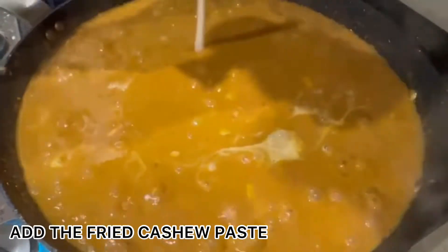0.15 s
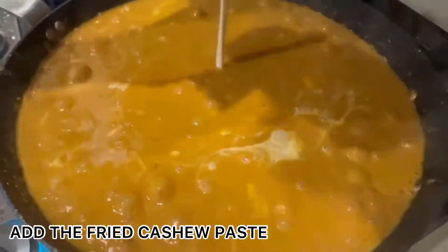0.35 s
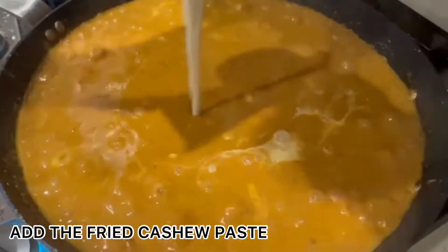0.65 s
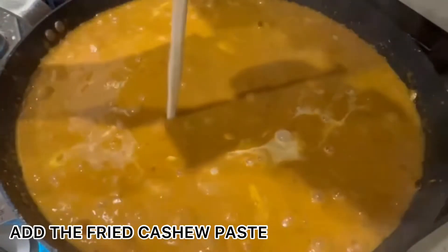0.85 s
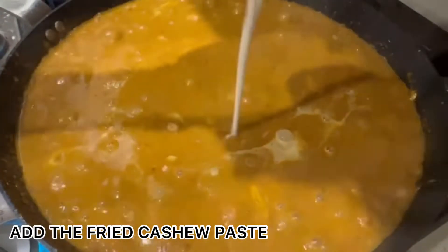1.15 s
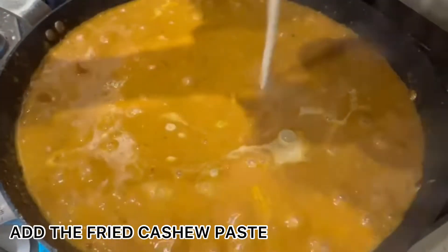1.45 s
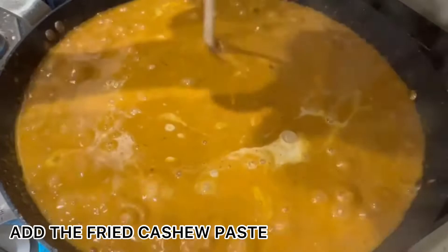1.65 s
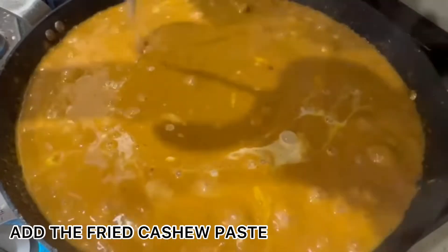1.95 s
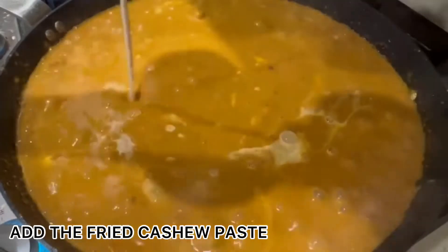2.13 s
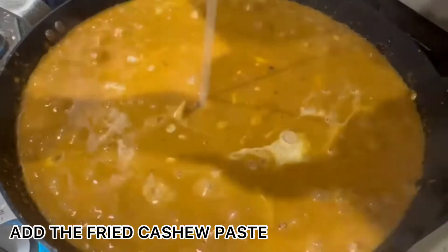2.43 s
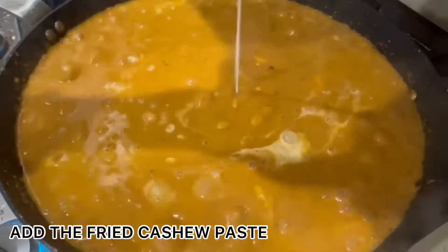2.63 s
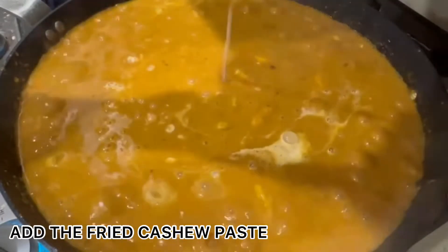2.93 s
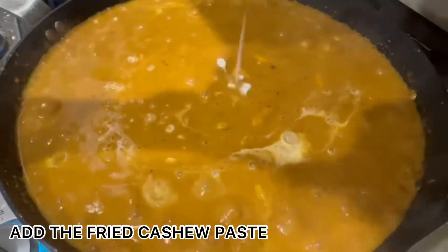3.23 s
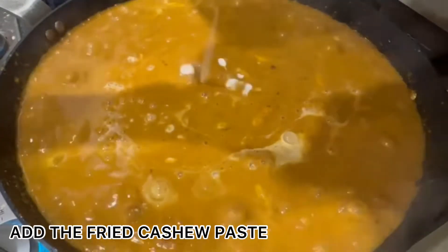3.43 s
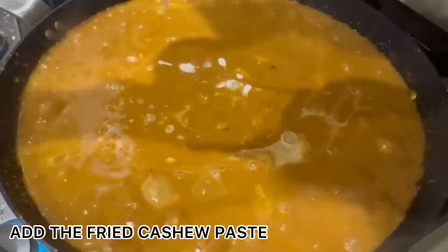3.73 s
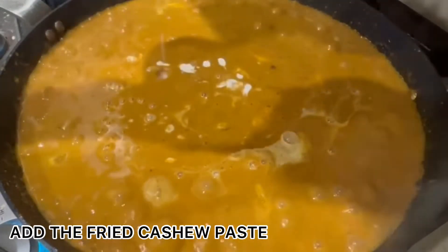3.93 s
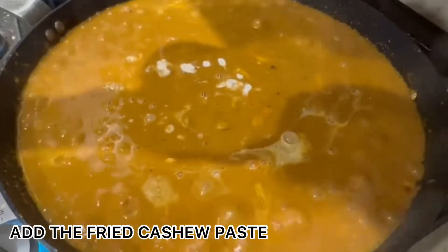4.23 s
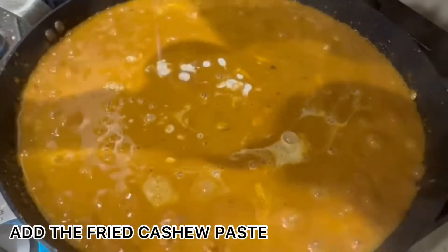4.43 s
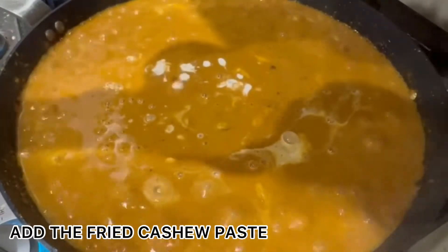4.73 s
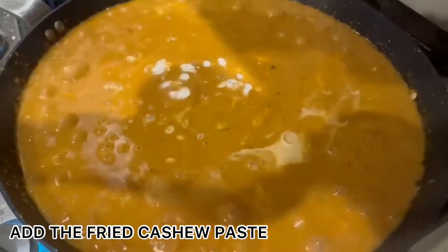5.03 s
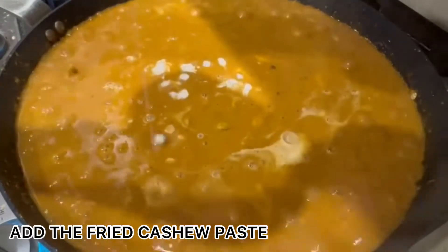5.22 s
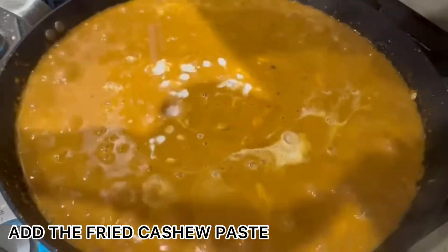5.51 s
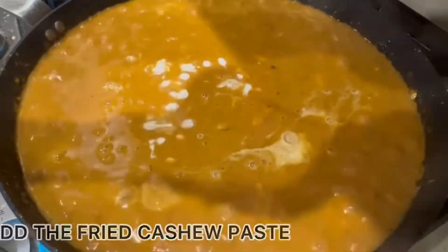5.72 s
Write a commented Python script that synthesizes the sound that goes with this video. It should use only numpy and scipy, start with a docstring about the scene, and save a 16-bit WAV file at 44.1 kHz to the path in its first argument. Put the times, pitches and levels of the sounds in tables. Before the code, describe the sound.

Thick sauce simmers in a pan with soft plops and a light sizzle, then two blobs of paste splat in.

```python
"""Thick gravy simmers in a wide pan, close by. From the start the stove rumbles, the oily
rim sizzles and faint bubbles murmur. Almost at once, steam bubbles open with short rising
plops, small ones spit, and now and then there is a soft, low thud. After a second, thin
films on the bubbles begin to snap. Just after four seconds, two blobs of paste splat in
and make the pan ring. A small kitchen echoes the bubbles and the splats."""
import sys
import numpy as np
from scipy import signal
from scipy.fft import rfft, irfft, next_fast_len
from scipy.io import wavfile

SR = 44100
rng = np.random.default_rng(int(sys.argv[2]) if len(sys.argv) > 2 else 0)


def master_out(mix):
    """Clip the mix to full scale and print it as 16-bit PCM to the path in sys.argv[1]."""
    frames = np.transpose(np.atleast_2d(mix))
    ceiling = np.clip(frames, -1, 1)
    pcm = np.round(ceiling * 32767).astype(np.int16)
    wavfile.write(sys.argv[1], SR, pcm)


N = 258867
T = np.arange(N) / SR  # seconds since the scene began
AGE = T[:2048]  # seconds since one short sound began
RIGHT_LAG_S = .000245  # how much later the right ear hears the pan

# Levels in the tables are relative: the functions turn them up or down.
# The tone of the stove's rumble. Each row: pitch in Hz, level in dB.
RUMBLE_TONE = [(15, -80), (30, -83), (48, -84), (70, -66.5), (100, -71.5), (140, -71.5), (210, -80.5),
               (320, -84), (600, -90.5), (1500, -115), (8000, -150)]
# The tone of the sizzling rim. Each row: pitch in Hz, level in dB.
SIZZLE_TONE = [(900, -32), (2000, 7.5), (2700, 4), (3300, 4.5), (4000, 4.5), (4450, 7.5), (5000, 6),
               (5800, 8.5), (6700, 4.5), (7700, 0), (9300, 4.5), (10300, -30), (11000, -4.5)]
# The tone of the bubbling murmur. Each row: pitch in Hz, level in dB.
MURMUR_TONE = [(120, -105), (300, -74.5), (460, -83.5), (630, -70), (730, -76.5), (830, -77.5), (1000, -75),
               (1300, -77.5), (1550, -76), (1900, -77.5), (2500, -120.5), (4000, -110), (10000, -140)]
# The simmer's slow swell. Each row: time in seconds, sizzle level in dB, murmur level in dB.
SIMMER_SWELL = [(0.0, -57, -53.5), (0.77, -55, -54), (1.44, -56.5, -55.5), (2.06, -56, -55.5),
                (2.68, -56, -55), (4.54, -56, -56), (5.03, -54, -57), (5.87, -55.5, -56.5)]
# Steam bubbles opening. Each row: start in seconds, level in dB, pitch in Hz,
# ring time in seconds, dB added to that level for the squelch.
STEAM_PLOPS = [(0.203, -44.5, 617, 0.019, 13), (0.262, -36.5, 883, 0.021, 5), (0.378, -46, 910, 0.018, 15),
               (0.46, -36, 813, 0.014, -9), (0.538, -40, 1240, 0.014, 14), (0.706, -43.5, 770, 0.018, 12),
               (1.025, -33, 940, 0.02, 7.5), (1.788, -34, 1110, 0.012, 6), (2.008, -42.5, 610, 0.038, 10),
               (2.084, -39, 648, 0.02, 3), (2.13, -42.5, 716, 0.025, -8), (2.435, -47.5, 640, 0.031, 22.5),
               (2.441, -38.5, 1060, .02, 1), (2.503, -44, 600, 0.016, -3), (2.592, -48, 627, 0.03, -7),
               (2.665, -47, 784, 0.023, -1), (2.777, -35.5, 996, 0.019, -3),
               (2.919, -43.5, 388, 0.014, 14.5), (2.95, -44.5, 657, 0.028, 7), (2.976, -40, 1110, 0.02, 8),
               (3.007, -43, 290, 0.024, 13), (3.141, -42, 1500, 0.033, 12), (3.263, -42, 607, 0.022, 14),
               (3.523, -35.5, 920, 0.023, 4), (3.761, -36, 935, 0.018, 12), (3.832, -48, 700, 0.027, 0),
               (3.869, -47, 624, 0.026, 21.5), (3.985, -41, 756, 0.014, 2), (4.213, -40.5, 805, 0.015, -4),
               (4.232, -39, 737, 0.03, 9), (4.605, -35.5, 1063, 0.015, -4), (4.632, -41, 780, 0.016, -6),
               (4.852, -38.5, 820, 0.02, 2), (4.914, -44.5, 593, 0.021, 18), (4.989, -43.5, 613, 0.02, 12),
               (5.31, -41, 433, 0.013, 8), (5.434, -39.5, 847, 0.017, -3)]
# The squelch of thick sauce. Each row: pitch in Hz, band width in Hz, level in dB.
SQUELCH_BANDS = [(470, 180, 4), (1070, 740, 4.5)]
# Small bubbles spit. Each row: start in seconds, level in dB, pitch in Hz, # band width as a share of the
# pitch, dB added to that level for the ping. # The row at 5.578 s is no spit: it fills out the middle of the
# film snapping then.
BUBBLE_SPITS = [(.3765, -40, 3300, 0.74, -20), (0.412, -37.5, 4500, 0.15, -1),
                (.546, -40.5, 3960, 0.68, -20), (0.7048, -38.5, 3160, 0.38, -19),
                (0.7697, -42, 5030, 0.38, -20), (.879, -36.5, 6070, 0.16, -9),
                (1.24, -37.5, 3000, 0.27, -8), (1.666, -40, 5180, 0.45, -15), (2.25, -41, 4370, 0.41, -20),
                (2.917, -38.5, 2770, 0.52, -15), (3.3026, -38, 3050, 0.51, -14),
                (3.4437, -40, 5550, 0.11, 3), (3.5703, -44, 2080, 0.13, 8), (3.968, -41, 2870, 0.36, -15),
                (4.7512, -35.5, 4500, 0.82, -12), (4.9294, -37, 5640, 0.63, -20),
                (5.123, -39.5, 3350, .5, -5), (5.425, -41.5, 5700, .5, -15),
                (5.578, -38.5, 4530, 0.45, -15), (5.744, -38, 4290, 0.17, -8)]
# Soft, low thuds. Each row: start in seconds, level in dB, pitch in Hz.
LOW_THUDS = [(0.484, -37, 93), (1.6, -29, 84), (2.718, -30.5, 62), (4.042, -30, 90), (4.435, -36.5, 78.6),
             (4.806, -37.5, 90)]
# Films snapping. Each row: start in seconds, level in dB, dB added for the hollow below.
FILM_SNAPS = [(1.0704, -38, -18), (1.307, -45, -12), (1.444, -46, 13), (1.4713, -41.5, 9),
              (1.5326, -34.5, 3), (1.677, -35, -16), (1.789, -35, -2), (1.834, -26.5, -7),
              (1.9033, -22.5, -1.5), (1.973, -43, -12), (2.0835, -34.5, 14), (2.177, -35.5, 4),
              (2.373, -45, 7), (2.49, -32.5, 5.5), (2.769, -42, -10), (2.9163, -40.5, -7),
              (3.139, -39.5, -1), (3.602, -34.5, -3), (3.7752, -31, 4), (3.803, -38.5, 6),
              (3.847, -43, -10), (5.5775, -39, -16)]
# The ring of a snapping film. Each row: pitch in Hz, band width in Hz, level in dB.
FILM_BANDS = [(1840, 950, 3), (5450, 2800, 3), (6300, 1800, 8), (8100, 710, 8), (9750, 4100, 7)]
# The hollow under a film. Each row: pitch in Hz, band width in Hz, level in dB.
HOLLOW_BANDS = [(580, 120, 11.5), (1150, 700, 13)]
# Blobs landing. Each row: start in seconds, slap level in dB, pitch in Hz above which
# the slap is dulled, wait in seconds until the pan rings.
BLOB_LANDINGS = [(4.2651, -1.5, 4240, 0.00031), (4.3724, -14.5, 11000, .0011)]
# The ring of a wet slap. Each row: pitch in Hz, band width in Hz, level in dB.
SLAP_BANDS = [(660, 560, 1.5), (1950, 830, 3), (3440, 810, 0), (5670, 1300, -1.5), (8100, 1700, -4.5)]
# The filled pan's own notes. Each row: pitch in Hz, ring time in seconds,
# level in dB under the first blob, level in dB under the second.
PAN_NOTES = [(161, .05, -33, -35), (290, 0.015, -32, -25.5), (573, 0.043, -21, -14.5),
             (653, 0.053, -14.5, -28), (703, 0.044, -19.5, -21.5), (820, 0.034, -12.5, -18),
             (1152, 0.029, -24, -17.5), (1315, 0.062, -29, -26), (1400, .025, -38, -19),
             (1525, 0.032, -19, -40), (1830, 0.044, -16.5, -38), (2050, 0.039, -11, -30),
             (2210, 0.033, -15, -26), (2867, 0.03, -32, -24), (3250, .028, -17, -31),
             (3820, 0.019, -18.5, -37), (4560, 0.037, -32, -51), (5430, 0.036, -35, -33)]
# Quick echoes off the pan wall and stove, one list for the left ear and one for the right.
# Each row: delay in seconds, strength (a minus flips the wave).
NEAR_ECHOES = [
    [(.0026, 0.26), (.0059, -0.17), (.0097, .12)],
    [(.0033, -0.18), (.0052, .17), (.0108, 0.14)],
]
# How much louder the left side is. Each row: pitch in Hz, left minus right in dB.
LEFT_BALANCE = [(200, 0), (400, 4), (650, 3), (1100, 2), (1800, .5), (3500, 1.5), (5500, 4.5), (6800, 4),
                (8000, 1), (9000, 0)]


def amp(db):
    """Turn decibels into a number to multiply by."""
    return 10 ** (np.asarray(db) / 20)


def rms_one(x):
    """Scale a sound to an average strength of 1."""
    return x / np.sqrt(np.mean(x ** 2) + 1e-20)


def add(track, s, sound):
    """Mix a sound in, starting at s seconds."""
    start = max(0, round(s * SR))
    track[start:start + len(sound)] += sound[:max(0, N - start)]


def delayed(x, s):
    """The same sound, s seconds later."""
    return np.pad(x, (max(0, round(s * SR)), 0))[:N]


def colour(x, tone):
    """Shape a sound's tone along a list of (Hz, dB) points."""
    hz, db = np.transpose(tone)
    size = next_fast_len(N + 4096)
    pitches = np.maximum(np.fft.rfftfreq(size, 1 / SR), 1)
    gain = amp(np.interp(np.log(pitches), np.log(hz), db))
    return irfft(rfft(x, size) * gain, size)[..., :N]


def low_pass(x, hz, order=2):
    """Dull a sound above hz; a higher order cuts more steeply."""
    return signal.sosfilt(signal.butter(order, min(hz, .45 * SR), fs=SR, output="sos"), x)


def resonate(x, hz, width_hz):
    """Keep one band of pitches; a narrower band rings longer."""
    r = np.exp(-np.pi * width_hz / SR)
    feedback = [1, -2 * r * np.cos(2 * np.pi * hz / SR), r * r]
    return signal.lfilter(np.array([1, 0, -1]) * (1 - r * r) / 2, feedback, x + 1e-18)


def crack(bands, fade_s):
    """A film tears in a quickly dying run of tiny breaks that make the bands ring."""
    fade = np.exp(-AGE / fade_s)
    tear = rng.standard_normal(len(AGE)) * fade
    for _ in range(4):
        # the breaks are so sharp that they hold all pitches equally
        evened = irfft(np.exp(1j * np.angle(rfft(tear))), len(AGE))
        tear = evened * fade ** (1 / 4)
    sound = sum((-1) ** k * amp(db) * resonate(tear, hz, width)
                for k, (hz, width, db) in enumerate(bands))
    return sound * np.sqrt(fade_s * SR / np.sum(sound ** 2)) / np.pi


def ring(hz, ring_s, rise, swell_cycles, hold=1):
    """A note rises by a share of hz and fades 60 dB in ring_s; hold above 1 puts off the fade."""
    life = AGE / ring_s
    pitch = hz * (1 + rise * (np.minimum(life, 1) - 1 / 6))
    swell = 1 - np.exp(-(AGE * hz / swell_cycles) ** 2)
    level = swell * amp(-60 * np.minimum(life, 2) ** hold)
    closing = np.minimum(1, 10 * (1 - AGE / AGE[-1]))  # avoids a click at the end
    return closing * level / level.max() * np.sin(2 * np.pi * np.cumsum(pitch) / SR)


def pan_noise(shared=0.34):
    """An even hiss: both ears share one part, late on the right, and each has a part of its own."""
    noise = rng.standard_normal(N)
    direct = np.array([noise, np.roll(noise, round(RIGHT_LAG_S * SR))])
    return np.sqrt(shared) * direct + np.sqrt(1 - shared) * rng.standard_normal((2, N))


def two_ears(x, right_lag_s):
    """Each ear gets its own quick echoes, and the right may hear everything late."""
    left, right = [x + sum(gain * delayed(x, s) for s, gain in side) for side in NEAR_ECHOES]
    return np.array([left, delayed(right, right_lag_s)])


def lean_left(x):
    """The left ear hears more of the pan's middle and high pitches."""
    return np.array([colour(side, np.array(LEFT_BALANCE) * [1, share])
                     for side, share in zip(x, (.5, -.5))])


def stove(hum_hz=50.5, hum_db=-53.5):
    """The burner rumbles under a faint, wavering hum."""
    flame = rng.standard_normal(N) + amp(-14) * rng.standard_normal((2, N))
    waver = rms_one(low_pass(rng.standard_normal(N), hz=11))
    hum = amp(hum_db) * (1 + waver / 2) * np.sqrt(2) * np.sin(2 * np.pi * hum_hz * T)
    return colour(flame * np.sqrt(SR / 2), RUMBLE_TONE) + hum


def rim_sizzle(per_s=2800, spread_db=6, hiss_db=7, spurt_db=0.9):
    """Tiny bursts and hiss along the hot rim swell and sink as steam reaches it unevenly."""
    pitches = np.geomspace(1800, 11000, 24)
    bursts = np.zeros((2, N))
    for hz in pitches:
        born = rng.random(N) < per_s / len(pitches) / SR
        sizes = np.minimum(rng.exponential(1, born.sum()), 4)
        clicks = np.zeros(N)
        clicks[born] = amp(spread_db * sizes) * rng.choice([-1, 1], born.sum())
        pings = resonate(clicks, hz, width_hz=hz / 24)
        bursts += [pings, np.roll(pings, round(RIGHT_LAG_S * SR))]
    sizzle = rms_one(colour(rms_one(bursts) + amp(hiss_db) * pan_noise(), SIZZLE_TONE))
    spurts = rms_one(low_pass(rng.standard_normal(N), hz=25))
    return sizzle * amp(spurt_db * spurts)


def murmur():
    """The bubbling blurs into one soft, steady noise."""
    return rms_one(colour(pan_noise(), MURMUR_TONE))


def small_plops(per_s=90, level_db=-38.5, spread_db=15, centre_hz=1080):
    """Faint bubbles open at random all over the surface and die away quickly."""
    out = np.zeros(N)
    for when, size, pitch, length in rng.random((int(per_s * N / SR), 4)):
        hz = centre_hz * 2 ** (2 * pitch - 1)
        plop = ring(hz, ring_s=(6 + 10 * length) / hz, rise=0.22, swell_cycles=1)
        add(out, when * N / SR, amp(level_db - spread_db * np.sqrt(size)) * plop)
    return out


def oil_crackle(per_s=40, level_db=-35.5, spread_db=22.5, centre_hz=4540):
    """Specks of oil spit at random, each a dry tick with its own pitch."""
    out = np.zeros(N)
    for when, size, pitch in rng.random((int(per_s * N / SR), 3)):
        hz = centre_hz * 2 ** (1.4 * (pitch - .5))
        tick = crack([(hz, hz / 2, 0)], fade_s=0.00065)
        add(out, when * N / SR, amp(level_db - spread_db * np.sqrt(size)) * tick)
    return out


def steam_plops():
    """A bubble opens with a squelch, rings higher as its mouth widens, and droplets fall back."""
    out = np.zeros(N)
    rises = 1 + 0.2 * rng.uniform(-1, 1, len(STEAM_PLOPS))
    for (s, db, hz, ring_s, squelch_db), rise in zip(STEAM_PLOPS, rises):
        add(out, s, amp(db + 0.5) * ring(hz, ring_s, rise, swell_cycles=0.5, hold=3))
        add(out, s, amp(db + squelch_db) * crack(SQUELCH_BANDS, fade_s=.0012))
        for when, pitch in rng.random((3, 2)):
            droplet_hz = hz * 1.28 * 2 ** (pitch - .5)
            droplet = ring(droplet_hz, ring_s=0.014, rise=0.15, swell_cycles=0.99)
            add(out, s + 0.012 * when, amp(db - 16) * droplet)
    return out


def bubble_spits():
    """Small bubbles spit: most sound dry, and a few ping briefly."""
    out = np.zeros(N)
    for s, db, hz, width, ping_db in BUBBLE_SPITS:
        add(out, s, amp(db + 4) * crack([(hz, width * hz, 0)], fade_s=.004))
        add(out, s, amp(db + ping_db) * ring(hz, ring_s=0.026, rise=0.054, swell_cycles=0.92))
    return out


def low_thuds():
    """Soft, heavy bumps, each only two or three waves long."""
    out = np.zeros(N)
    for s, db, hz in LOW_THUDS:
        add(out, s, amp(db) * ring(hz, ring_s=0.058, rise=.05, swell_cycles=0.84, hold=1.5))
    return out


def film_snaps():
    """Larger films snap, the harder the brighter, and knock the hollow below."""
    out = np.zeros(N)
    for s, db, hollow_db in FILM_SNAPS:
        snap = low_pass(crack(FILM_BANDS, fade_s=.003), hz=12600 + 75 * db, order=12)
        add(out, s, amp(db + 10) * snap)
        add(out, s, amp(db + hollow_db + 4.5) * crack(HOLLOW_BANDS, fade_s=0.0015))
    return out


def blob_splats():
    """A blob slaps the gravy and its weight rings the pan; where it lands sets each note's level."""
    out = np.zeros(N)
    for blob, (s, db, dull_hz, wait_s) in enumerate(BLOB_LANDINGS):
        add(out, s, amp(db) * low_pass(crack(SLAP_BANDS, fade_s=0.0047), dull_hz))
        for k, (hz, ring_s, *note_db) in enumerate(PAN_NOTES):
            note = (-1) ** k * ring(hz, ring_s, rise=0, swell_cycles=1)
            add(out, s + wait_s, amp(note_db[blob] - 1) * note)
    return lean_left(two_ears(out, right_lag_s=0.00021)) * amp([[0.5], [-0.5]])


def kitchen(x, dull_hz, echo_s=0.31):
    """Tiles and cupboards send back a short, blurred echo, different in each ear."""
    t = T[:SR // 2]
    tail = rng.standard_normal((2, len(t))) * amp(-60 * t / echo_s)
    build_up = 1 - np.exp(-t / 0.00047)
    tail = low_pass(tail * build_up, dull_hz, order=1)
    return signal.fftconvolve(x, tail / np.sqrt(np.sum(tail[0] ** 2)), axes=1)[:, :N]


def scene(top_hz=11200):
    """Sizzle, murmur and bubbles fill the pan; the blobs land in it and the kitchen answers."""
    times, sizzle_db, murmur_db = np.transpose(SIMMER_SWELL)
    simmer = amp(np.interp(T, times, sizzle_db) + 5) * rim_sizzle()
    simmer += amp(np.interp(T, times, murmur_db) + 4) * murmur()
    plops = steam_plops() + small_plops()
    plops += amp(-2) * resonate(plops, hz=609, width_hz=61)  # the bubbles set the pan ringing
    spits = bubble_spits() + oil_crackle()
    bubbles = two_ears(plops, RIGHT_LAG_S) + two_ears(spits, right_lag_s=0)
    films = two_ears(film_snaps(), RIGHT_LAG_S)
    blobs = blob_splats()
    room = amp(-13.5) * kitchen(bubbles + amp(-2) * films, dull_hz=3200)
    room += amp(-17) * kitchen(blobs, dull_hz=7160)
    treble_cut = signal.ellip(8, .5, 60, top_hz, fs=SR, output="sos")
    softened = signal.sosfilt(treble_cut, lean_left(simmer + bubbles) + blobs + room)
    return softened + lean_left(films) + stove() + low_thuds()


def record(dry):
    """Round off the loudest peaks and cut the very highest pitches."""
    treble_cut = signal.ellip(12, .2, 100, 12850, fs=SR, output="sos")
    return signal.sosfilt(treble_cut, np.tanh(dry))


dry = scene()
out = record(dry)
master_out(out)
```